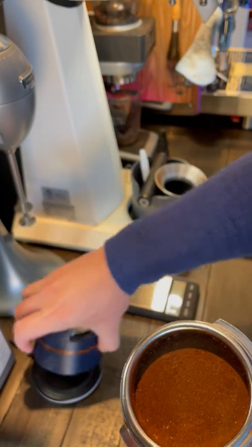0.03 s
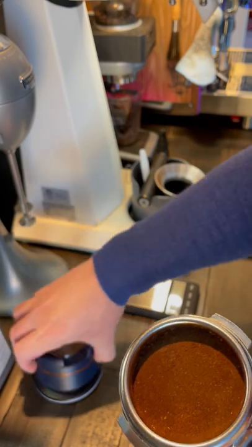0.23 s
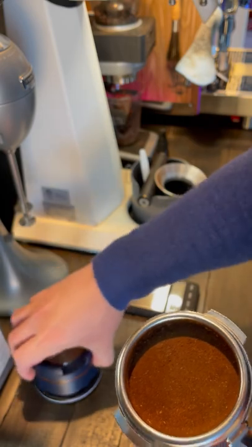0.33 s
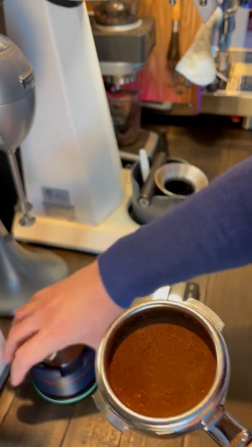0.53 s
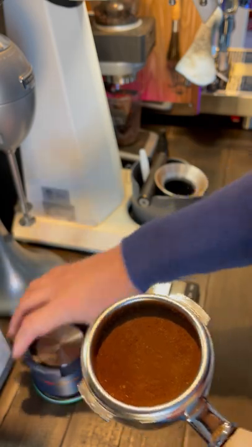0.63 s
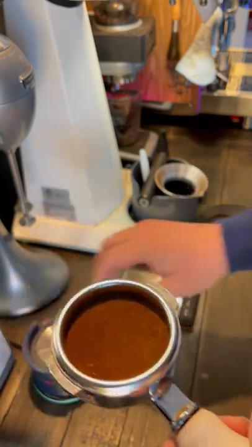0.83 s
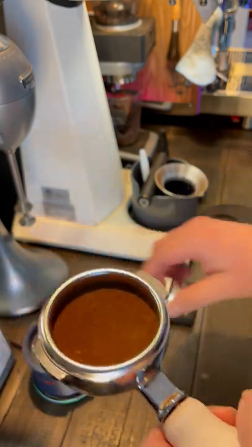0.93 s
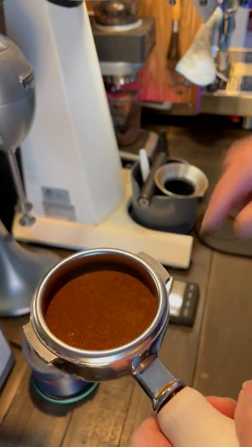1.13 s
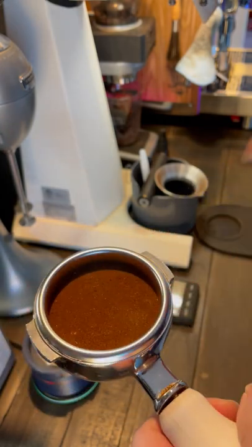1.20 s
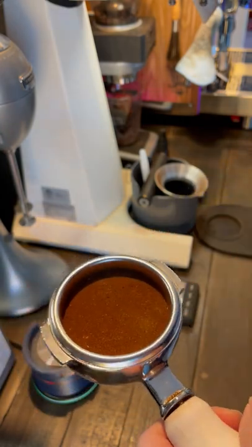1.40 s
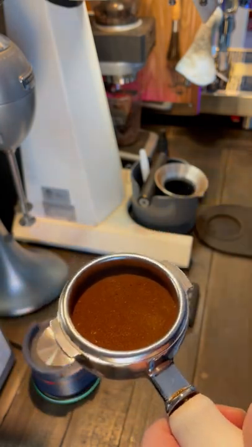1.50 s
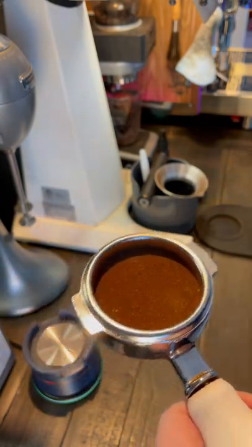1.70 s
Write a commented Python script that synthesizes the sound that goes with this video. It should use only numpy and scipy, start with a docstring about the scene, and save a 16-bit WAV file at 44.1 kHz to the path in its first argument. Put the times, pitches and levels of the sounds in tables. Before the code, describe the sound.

A heavy steel coffee tamper lands in its stand on a wooden counter with one thump. It rocks with a faint tap, then a sleeve rustles softly. Appliances hum quietly in a small kitchen, heard up close.

```python
"""A small kitchen, where appliances hum and a sleeve rustles. A heavy steel coffee tamper is set down in
its stand on a wooden counter: one edge lands, and the base drops flat 20 ms later. Each impact excites
damped modes, low in the counter (a thump) and higher in the stand (a knock), with a tick at the contact.
The tamper rocks twice, its rim clicking faintly, and the hand lets go with dull bumps.
Things on the counter scatter the sound, and the room adds a short reverberation."""
import sys
import numpy as np
from scipy import signal
from scipy.fft import rfft, irfft
from scipy.io import wavfile
from scipy.ndimage import uniform_filter1d

SR = 44100
rng = np.random.default_rng(int(sys.argv[2]) if len(sys.argv) > 2 else 0)


def unload_audio(sound):
    """Save the sound as a 16-bit wav file, at the path given as the first command line argument."""
    columns = np.transpose(np.atleast_2d(sound))
    # keep every value between -1 and 1, then stretch to whole-number steps
    steps = np.round(np.clip(columns, -1, 1) * 32767)
    wavfile.write(sys.argv[1], SR, steps.astype(np.int16))


N = 77175
TIME = np.arange(N) / SR


def amp(db):
    """Decibels to amplitude ratio."""
    return 10 ** (np.asarray(db) / 20)


def unit(x):
    """Normalisation to rms 1."""
    return x / np.sqrt(np.mean(x ** 2) + 1e-30)


def read(points, hz):
    """Interpolation on a log-frequency axis."""
    f, value = np.transpose(points)
    return np.interp(np.log(hz + 1), np.log(f + 1), value)


def pan(db):
    """Level difference as left and right gains."""
    return amp(np.array([np.atleast_1d(db), -np.atleast_1d(db)]) / 2)


def decay(t, t60):
    """Exponential damping: 60 dB down after t60 seconds."""
    return np.exp(-np.log(1000) * t / t60)


def colour(x, gain):
    """Zero-phase filtering by a gain that depends on frequency."""
    return irfft(rfft(x) * gain(np.fft.rfftfreq(x.shape[-1], 1 / SR)), x.shape[-1])


def causal(x, points, size=2048):
    """Minimum-phase filtering at unit power gain: nothing rings ahead of the attack."""
    log_gain = np.log(amp(read(points, abs(np.fft.fftfreq(size, 1 / SR)))))
    taps = np.fft.ifft(np.exp(np.conj(signal.hilbert(log_gain)))).real
    return signal.fftconvolve(x, taps[None] / np.linalg.norm(taps), axes=1)[:, :x.shape[1]]


def rolloff(x, kind, hz, order):
    """Maximally flat filtering, 6 dB per octave for each order."""
    return signal.sosfilt(signal.butter(order, hz, kind, fs=SR, output="sos"), x)


def add(mix, s, sound):
    """Superposition of a sound starting at s seconds."""
    part = mix[:, round(s * SR):][:, :sound.shape[1]]
    part += sound[:, :part.shape[1]]


def narrow(hz, width_hz, channels=1):
    """Resonance driven by noise; the amplitude halves at width_hz from the centre."""
    return unit(colour(rng.standard_normal((channels, N)), lambda f: 1 / (1 + ((f - hz) / width_hz) ** 2)))


def ring(modes, t, rise_cycles, soft_s=0, bend_s=0):
    """Damped modes pushed downward; bend_s is the travel time of a bending wave at 300 Hz."""
    out = 0
    for hz, db, t60, pan_db in modes:
        age = np.maximum(t - bend_s * np.sqrt(300 / hz), 0)  # dispersion: low modes arrive later
        envelope = (1 - np.exp(-age * hz / rise_cycles)) * decay(age, t60)
        drive = amp(db) / (1 + (2 * hz * soft_s) ** 2)  # a soft contact barely excites high modes
        out = out - pan(pan_db) * drive * envelope * np.sin(2 * np.pi * hz * age)
    return out


def background():
    """Partial correlation: a drifting rumble, alike in left and right, and a faint high hiss."""
    # rumble and hiss (frequency [Hz], relative spectral density [dB])
    spectrum = [(15, -20.5), (28, 5), (45, -1), (68, 5.5), (100, -7.5), (160, -6), (230, -13.5), (330, -9),
                (480, -9), (680, -26), (950, -35), (1400, -40), (1900, -44.5), (3500, -43.5), (4500, -49.5),
                (7000, -54), (11000, -54.5), (14000, -63)]
    # the hiss is partly opposite in left and right near 7.7 kHz (frequency [Hz], correlation [-1 to 1])
    correlation = [(60, .98), (110, .95), (200, .8), (350, .55), (600, .3), (1500, 0), (5000, .1),
                   (7700, -.6), (10000, .15), (14000, -.3)]
    # balance of the noise (frequency [Hz], left minus right [dB])
    balance = [(60, 13), (200, -4.5), (500, 0.5), (3000, 2)]
    level_db, patch_db = -52, 1.5
    _, _, bins = signal.stft(rng.standard_normal((2, N)), SR, nperseg=1024)
    patches = uniform_filter1d(rng.standard_normal(bins.shape[1:]), size=10, axis=0)
    patches = unit(uniform_filter1d(patches, size=10, axis=1))
    mid, side = signal.istft(bins * amp(patch_db * patches), SR, nperseg=1024)[1][:, :N]
    mid = colour(mid, lambda f: np.sqrt(1 + read(correlation, f)))
    side = colour(side, lambda f: np.sqrt(1 - read(correlation, f)))
    stereo = np.array([mid + side, mid - side])
    return amp(level_db) * unit(colour(stereo, lambda f: amp(read(spectrum, f)) * pan(read(balance, f))))


def hum():
    """Narrow-band noise: wavering appliance tones and a thin hiss that comes and goes."""
    # appliance tones (frequency [Hz], level [dB], half-width [Hz], left minus right [dB])
    partials = [(71.3, -55, 3.6, -5), (298.6, -72, 3.6, -11.5), (381.1, -66, 3.2, 2), (438.4, -82, 20, 19),
                (726, -85.5, 1.2, -4), (1059, -99.5, 1.1, 18.5), (1474, -99, 2.2, -6.5)]
    # envelope of the hiss (time [s], level [dB])
    hiss_levels = [(0, -85), (.35, -82), (.55, -84.5), (.88, -95), (1.14, -86), (1.22, -83), (1.3, -82),
                   (1.36, -93), (1.48, -90), (1.505, -78), (1.56, -88.5), (1.73, -80.5)]
    tones = sum(pan(pan_db) * amp(db) * narrow(hz, width) for hz, db, width, pan_db in partials)
    hiss_gain = amp(np.interp(TIME, *np.transpose(hiss_levels)))
    return tones + hiss_gain * narrow(hz=2847, width_hz=118, channels=2)


def sleeve():
    """Friction of cloth: soft swells of noise as the arm moves, the low band common to both ears."""
    # rustles (time [s], standard deviation [s], low band [dB], middle band [dB], high band [dB])
    rustles = [(.02, 0.03, -63, -74, -81.5), (0.158, 0.12, -70, -71.5, -92),
               (0.606, 0.058, -56, -69, -86.5), (1.53, 0.13, -74.5, -93, -87)]
    # bands of cloth noise (lower corner [Hz], upper corner [Hz])
    bands = [(50, 387), (500, 890), (3000, 4800)]
    out = np.zeros((2, N))
    for k, (lo, hi) in enumerate(bands):
        noise = rng.standard_normal((2 if k else 1, N))
        noise = colour(noise, lambda f: (f / lo) ** 2 / (1 + (f / lo) ** 2) / (1 + (f / hi) ** 2) ** 2)
        swells = sum(amp(db[k]) * np.exp(-.5 * ((TIME - s) / spread) ** 2) for s, spread, *db in rustles)
        out += unit(noise) * swells
    return out


def scrapes():
    """Sliding friction: brief swells of narrow-band noise as the tools are handled."""
    # scrapes (time [s], standard deviation [s], level [dB], centre [Hz], half-width [Hz])
    slides = [(0.006, 0.023, -80.5, 9300, 300), (0.116, 0.0099, -78.5, 2150, 260),
              (0.172, 0.0076, -52.5, 532, 35), (1.513, 0.016, -86.5, 4380, 400),
              (1.548, 0.024, -86, 2490, 149)]
    return sum(amp(db) * np.exp(-.5 * ((TIME - s) / spread) ** 2) * narrow(hz, width, channels=2)
               for s, spread, db, hz, width in slides)


def room(x):
    """Reverberation: a diffuse tail, each band absorbed at its own rate."""
    # reverberation time (frequency [Hz], T60 [s])
    decay_times = [(80, 0.26), (300, 0.51), (1200, 0.27), (3000, 1), (8000, 0.31), (15000, .12)]
    # strength of the tail (frequency [Hz], level against the direct sound [dB])
    levels = [(80, -21), (300, -14.5), (700, -0.5), (1200, -13.5), (3000, -18.5), (8000, -27), (15000, -22)]
    gap_s = .006
    hz, t, bins = signal.stft(rng.standard_normal((2, SR // 2)), SR, nperseg=256)
    t60 = read(decay_times, hz)[:, None]
    envelope = decay(t, t60) * np.sqrt(2 * np.log(1000) / (t60 * SR))  # unit energy
    tail = signal.istft(bins * amp(read(levels, hz))[:, None] * envelope, SR, nperseg=256)[1]
    tail = np.pad(tail, ((0, 0), (round(gap_s * SR), 0)))
    return signal.fftconvolve(x, tail, axes=1)[:, :N]


def clutter(t):
    """Scattering: things on the counter spread a knock into lingering noise."""
    # scattered sound (frequency [Hz], relative level [dB])
    spectrum = [(100, -41), (250, -6), (540, 2.5), (690, -18.5), (850, -13), (1150, -2.5), (1600, -7.5),
                (2100, -17), (3200, -17), (4500, -30), (12000, -39)]
    relative_db, rise_s = -35, .0051
    envelope = amp(relative_db) * (1 - np.exp(-t / rise_s)) * decay(t, t60=.42)
    return causal(rng.standard_normal((2, len(t))) * envelope, spectrum)


def rim():
    """Light impacts: the rim clicks on the stand in damped bursts of noise."""
    # clicks (time [s], level [dB], centre [Hz], half-width [Hz])
    clicks = [(0.4198, -61.5, 2050, 334), (0.423, -74.5, 6500, 6000)]
    out = np.zeros((2, N))
    for s, db, hz, width_hz in clicks:
        add(out, s, amp(db) * narrow(hz, width_hz, channels=2) * decay(TIME, t60=.035))
    return out


def release(t):
    """Free vibration of one low mode: dull bumps as the hand lets go."""
    # bumps (time [s], gain [dB])
    bumps = [(0.597, -35.5), (0.646, -36), (0.747, -44.5)]
    # their mode (frequency [Hz], relative level [dB], T60 [s], left minus right [dB])
    mode = [(70.6, 0.5, 0.12, -3.5)]
    out = np.zeros((2, N))
    for s, db in bumps:
        add(out, s, amp(db) * ring(mode, t, rise_cycles=.4))
    return out


def contact_tick(t):
    """Impact transient: a brief contact gives broadband noise, with a weak scattered tail."""
    # tick (frequency [Hz], relative level [dB])
    spectrum = [(600, -38.5), (1200, -12.5), (2500, -4.5), (3500, -13.5), (6000, -15.5), (7600, -33.5),
                (9500, -22), (12000, -19), (14000, -53), (16000, -19)]
    rise_s, scatter_db = .00069, -20.5
    envelope = (1 - np.exp(-t / rise_s)) * (decay(t, t60=.031) + amp(scatter_db) * decay(t, t60=.1))
    return causal(rng.standard_normal((2, len(t))) * envelope, spectrum)


def stand_knock(t):
    """Modal ringing of the tamper in its stand, swelling over a few cycles."""
    # modes (frequency [Hz], relative level [dB], T60 [s], left minus right [dB])
    modes = [(959, -12, 0.038, -13), (1140, -1.5, 0.021, -4), (1209, -1, 0.031, -2.5),
             (1996, -19, 0.04, -2), (2045, -24, 0.063, 6), (2726, -24, 0.033, -2.5)]
    return ring(modes, t, rise_cycles=4.3)


def counter_thump(t, soft_s):
    """Bending modes of the wooden board, which radiates well only in a limited band."""
    # modes (frequency [Hz], relative level [dB], T60 [s], left minus right [dB])
    modes = [(104, -3, .19, -3.4), (150, -9, .2, -4), (198, 14, .035, -3.3), (237, .5, .18, -.4),
             (291, 3.5, .125, -7.7), (397, -10, .19, -2), (443, 1.5, .125, 0), (524, -15, .055, -3),
             (586, -14, .17, -.6)]
    bending = ring(modes, t, rise_cycles=.4, soft_s=soft_s, bend_s=.0021)
    bending = rolloff(bending, "highpass", hz=98.5, order=3)
    return rolloff(bending, "lowpass", hz=568, order=5)


def tamper(t):
    """Impact excitation: each blow ticks, knocks the stand and sets the counter ringing."""
    # the edge lands, the base drops flat, then two soft rocks
    # (time [s], thump gain [dB], knock gain [dB], tick gain [dB], contact softness [s])
    blows = [(0.2088, -21, -23.5, -45, .0001), (0.2286, -27.5, -27.5, -55, 0.000089),
             (0.4126, -32.5, -68, -82, 0.0035), (0.4276, -31.5, -84.5, -93, 0.0035)]
    out = np.zeros((2, N))
    for s, thump_db, knock_db, tick_db, soft_s in blows:
        tick = amp(tick_db) * contact_tick(t)
        thump = amp(thump_db) * counter_thump(t, soft_s)
        knock = amp(knock_db) * (stand_knock(t) + clutter(t))
        add(out, s, thump + knock + tick)
    return out


def scene():
    """Superposition of the impacts, their reverberation and the quiet background."""
    t = np.arange(SR // 2) / SR  # time since an impact
    hits = tamper(t) + release(t) + rim()
    return hits + room(hits) + background() + hum() + sleeve() + scrapes()


def record(dry):
    """Band limiting: the microphone rolls off the bass, and a steep low-pass cuts the top treble."""
    thin = rolloff(dry, "highpass", hz=38, order=3)
    taps = signal.firwin(511, cutoff=15750, window=("kaiser", 9), fs=SR)
    return signal.oaconvolve(thin, taps[None], "same")


dry = scene()
out = record(dry)
unload_audio(out)
```